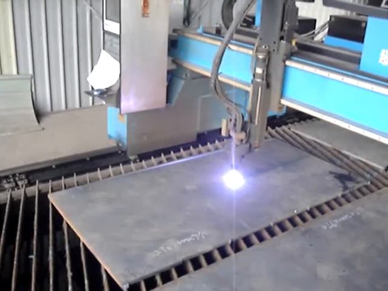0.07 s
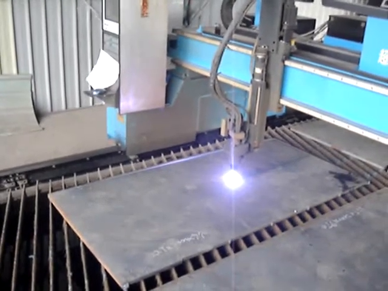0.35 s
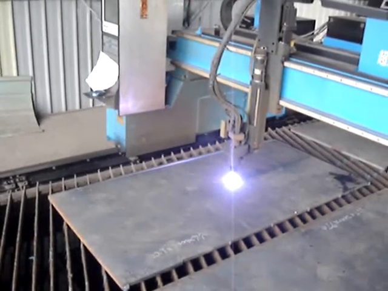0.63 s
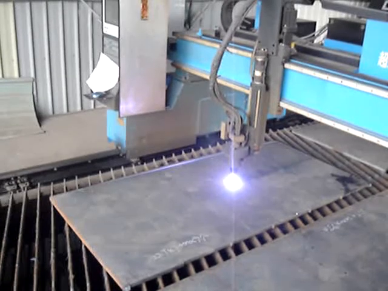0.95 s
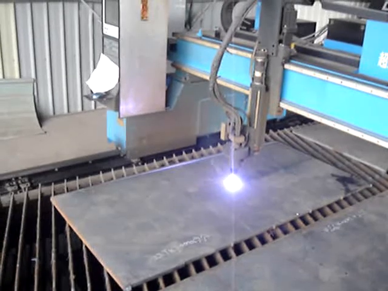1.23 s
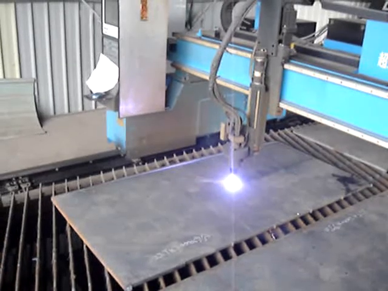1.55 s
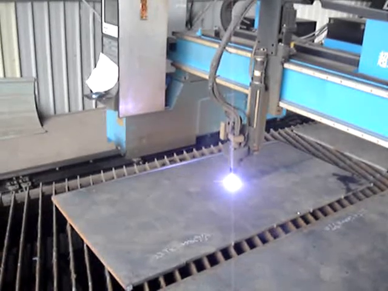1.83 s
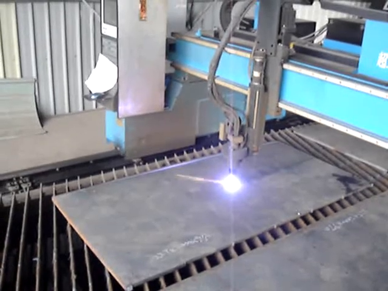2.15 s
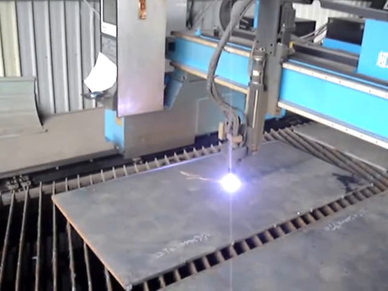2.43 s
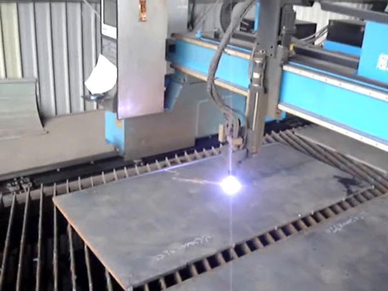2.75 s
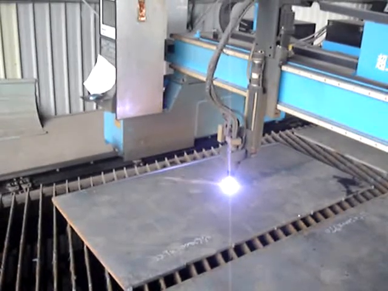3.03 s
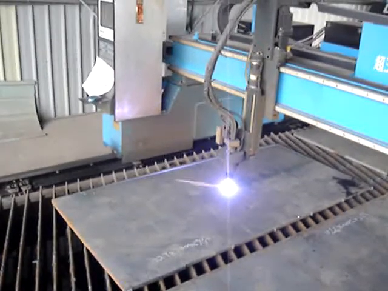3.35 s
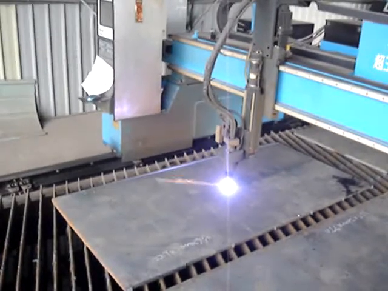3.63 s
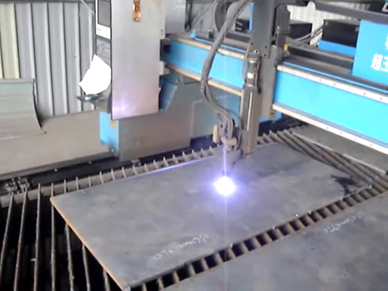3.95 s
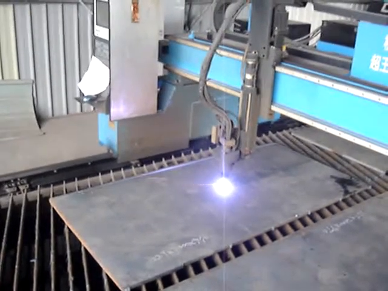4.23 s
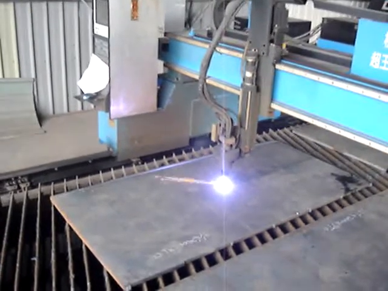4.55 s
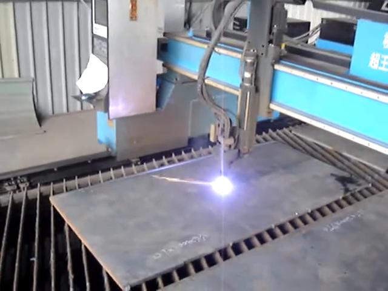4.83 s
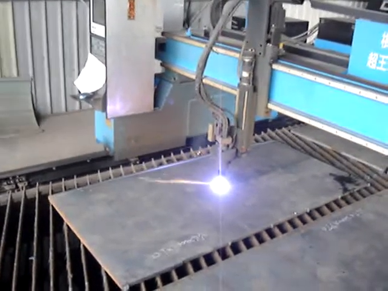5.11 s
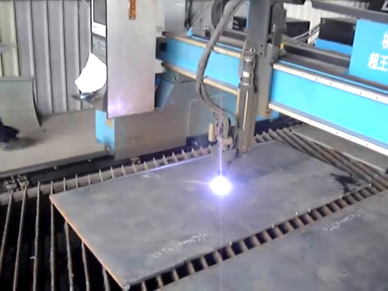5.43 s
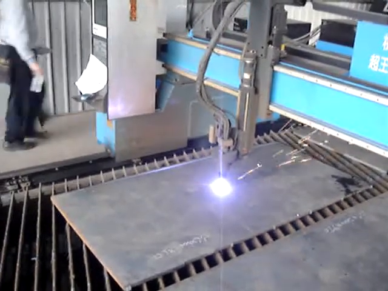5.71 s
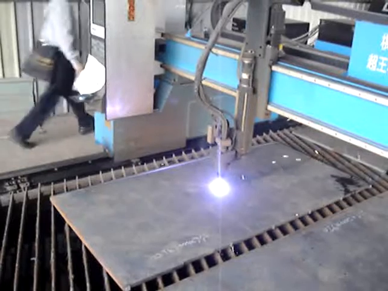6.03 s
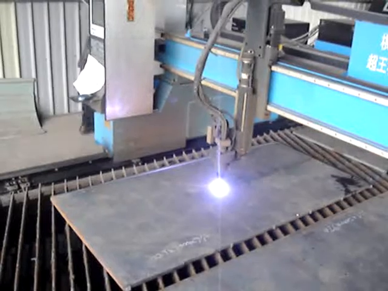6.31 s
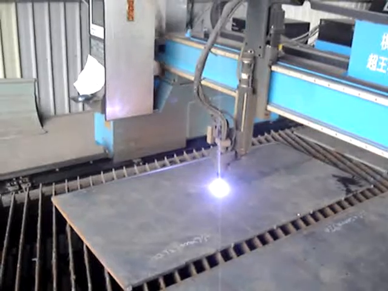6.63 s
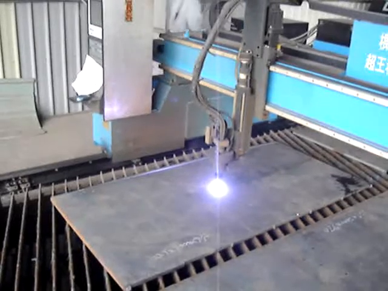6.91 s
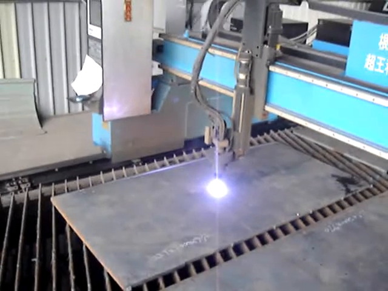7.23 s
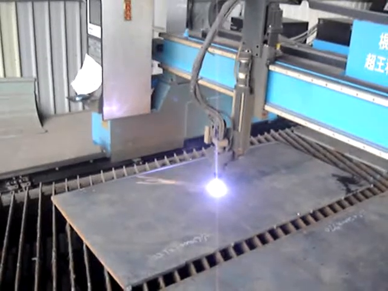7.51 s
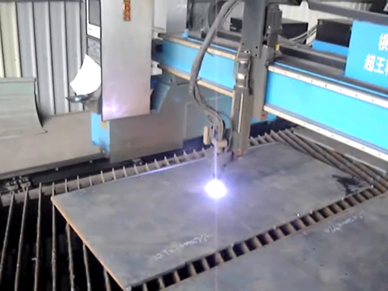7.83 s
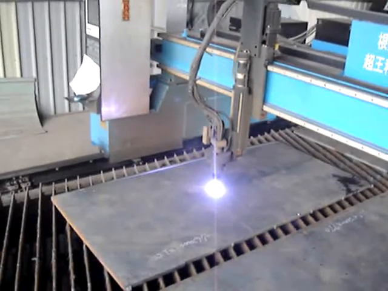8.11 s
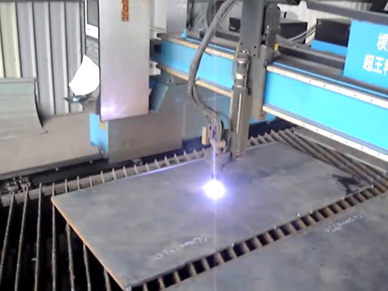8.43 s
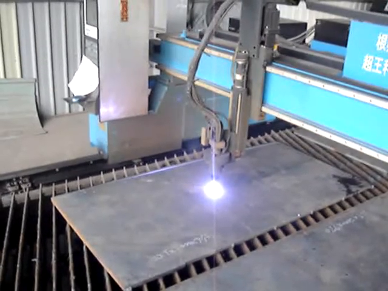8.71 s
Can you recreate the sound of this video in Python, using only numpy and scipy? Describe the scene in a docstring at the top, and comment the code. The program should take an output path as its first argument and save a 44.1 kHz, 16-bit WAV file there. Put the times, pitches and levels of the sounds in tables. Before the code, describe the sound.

Close, harsh hissing and a piercing whistle from a plasma cutter, over a soft flame roar with one brief whoosh early on.

```python
"""Plasma torch cutting steel plate.

A cutting machine in a workshop, heard close. The gas jet hisses through the resonances of nozzle
and cut and whistles with a high whine. The band around the whine drops out for milliseconds at a
time, heard as a flicker. The flame roars under the plate. Once the jet flares with a hollow whoosh,
as if crossing a slat of the table. Far off, an engine changes speed."""
import sys
import numpy as np
from scipy import signal
from scipy.fft import rfft, irfft
from scipy.io import wavfile
from scipy.ndimage import uniform_filter1d

SR = 44100
rng = np.random.default_rng(int(sys.argv[2]) if len(sys.argv) > 2 else 0)


def transcribe(signal):
    """Save signal, clipped to [-1, 1], as a 16-bit WAV file at the path in sys.argv[1]."""
    frames = np.atleast_2d(signal).T
    limited = np.clip(frames, -1, 1)
    pcm = np.round(limited * 32767).astype(np.int16)
    wavfile.write(sys.argv[1], SR, pcm)


N = 386316
TIME_S = np.arange(N) / SR
FREQS_HZ = np.fft.rfftfreq(N, 1 / SR)


def from_db(db):
    """Decibels to amplitude."""
    return 10 ** (np.asarray(db) / 20)


def unit_rms(x):
    """Scales to rms 1."""
    return x / np.sqrt(np.mean(x ** 2) + 1e-20)


def curve(rows):
    """Interpolates (seconds, value) rows at every sample."""
    return np.interp(TIME_S, *np.transpose(rows))


def arch(middle_s, length_s):
    """A smooth rise from 0 to 1 and back."""
    return np.cos(np.pi * np.clip((TIME_S - middle_s) / length_s, -.5, .5)) ** 2


def swells_db(rows):
    """Sum of arch-shaped swells or dips."""
    return sum(lift_db * arch(middle_s, length_s) for middle_s, length_s, lift_db in rows)


def resonance(hz, centre_hz, width_hz):
    """A resonance peak of height 1."""
    return 1 / (1 + (2 * (hz - centre_hz) / width_hz) ** 2)


def colour(spectrum, modes=()):
    """Gain over frequency: a smooth spectrum lifted by resonances."""
    points_hz, points_db = np.transpose(spectrum)
    smooth_db = np.interp(np.log(FREQS_HZ + 1), np.log(points_hz + 1), points_db)
    lift_db = sum(db * resonance(FREQS_HZ, hz, width_hz) for hz, width_hz, db in modes)
    return from_db(smooth_db + lift_db)


def band(hz, width_hz, order):
    """Gain of a band around hz; higher orders are steeper."""
    return 1 / np.sqrt(1 + abs(2 * (FREQS_HZ - hz) / width_hz) ** (2 * order))


def filtered(x, gain):
    """Applies a gain over frequency."""
    return irfft(rfft(x) * gain, N)


def noise(gain):
    """Noise of rms 1 with the given colour."""
    return unit_rms(filtered(rng.standard_normal(N), gain))


def sine(hz):
    """A sine of peak 1 following a frequency curve."""
    return np.sin(2 * np.pi * np.cumsum(hz) / SR)


def wander(rate_hz):
    """Random control of rms 1, low-passed at rate_hz."""
    lowpass = signal.butter(2, rate_hz, fs=SR)
    return unit_rms(signal.lfilter(*lowpass, rng.standard_normal(N)))


def patchy(x, depth_db, window, bins, frames):
    """Swells and sinks random patches of the spectrogram, keeping the overall level."""
    spectra = signal.stft(x, nperseg=window)[2]
    patches = uniform_filter1d(rng.standard_normal(spectra.shape), bins, axis=0)
    patches = unit_rms(uniform_filter1d(patches, frames, axis=1))
    mottled = signal.istft(spectra * from_db(depth_db * patches), nperseg=window)[1][:N]
    return x.std() * unit_rms(mottled)


def travel(start_s=4.3, end_s=5.46):
    """Progress of the torch: 0 early in the cut, 1 late."""
    return np.interp(TIME_S, [start_s, end_s], [0, 1])


# Engine speed. Each row: time in seconds, firing rate in Hz.
ENGINE_SPEED = [(0, 53), (.3, 54.5), (.7, 61), (1.1, 57.5), (1.7, 58), (2.4, 69.5), (2.7, 69.5), (3.1, 66),
                (3.8, 70), (4.1, 67), (4.55, 55), (5.8, 62), (6.35, 68.5), (6.8, 66.5), (7.5, 73),
                (7.9, 73.5), (8.25, 68), (8.76, 70.5)]
# Dips in the hum. Each row: middle and length in seconds, first- and second-order change in dB.
HUM_DIPS = [(4.25, .5, -10, -11), (6.53, .25, -7, -7), (7.97, 0.61, -2, -14)]


def engine(reference_hz=65.9, first_db_per_hz=1.1, second_db_per_hz=.43, boom_db=8.5, waver_db=.9):
    """A far engine's two lowest orders come through the walls, louder as it speeds up."""
    firing_hz = curve(ENGINE_SPEED)
    excess_hz = firing_hz - reference_hz
    first_db = -74 + first_db_per_hz * excess_hz
    second_db = -65.5 + second_db_per_hz * excess_hz
    second_db += boom_db * resonance(2 * firing_hz, centre_hz=137.2, width_hz=13)  # workshop mode
    for middle_s, length_s, first_dip_db, second_dip_db in HUM_DIPS:
        dip = arch(middle_s, length_s)
        first_db += first_dip_db * dip
        second_db += second_dip_db * dip
    first = unit_rms(sine(firing_hz)) * from_db(first_db)
    second = unit_rms(sine(2 * firing_hz)) * from_db(second_db)
    return (first + second) * from_db(waver_db * wander(7))


# Flame strength. Each row: time in seconds, roar level in dB.
ROAR_LEVEL = [(0, -38.5), (2.1, -39), (3.2, -36.5), (4.1, -37), (5.0, -37.8), (5.8, -38.5), (6.25, -36.5),
              (7.5, -36.5), (8.76, -37)]
# Roar and rumble spectra. Each row: frequency in Hz, relative level in dB.
ROAR_SPECTRUM = [(20, -33), (50, -31.5), (100, -21), (170, -12.5), (330, -7), (520, -0.5), (950, -1),
                 (1500, -1), (2000, -8), (3500, -8), (10000, -32.5)]
RUMBLE_SPECTRUM = [(60, -36.5), (140, -13.5), (200, -2), (250, 2), (300, 5), (350, -5), (560, -22),
                   (1200, -40)]
# Cutting-table resonances. Each row: frequency in Hz, width in Hz, lift in dB.
TABLE_MODES = [(305, 40, 2), (394, 30, 2), (480, 50, 2), (770, 80, 2.5), (950, 70, 2.5), (1120, 130, 2),
               (1310, 80, 1.5)]
# The table's moans. Each row: middle in seconds, length in seconds, lift in dB.
MOANS = [(4.72, .6, 5.5), (5.98, .5, 9), (6.42, .45, 4.5), (7.1, 0.49, 4)]


def flame(rumble_db=-50.4, rumble_db_per_db=1.9, moan_db=-51):
    """The flame roars under the plate; the hollow table rumbles with it and now and then moans."""
    roar_db = curve(ROAR_LEVEL)
    surge_db = roar_db - roar_db.mean()
    roar = noise(colour(ROAR_SPECTRUM, TABLE_MODES)) * from_db(roar_db)
    rumble = noise(colour(RUMBLE_SPECTRUM)) * from_db(rumble_db + rumble_db_per_db * surge_db)
    moan = noise(band(385, 130, order=3)) * from_db(moan_db + swells_db(MOANS))
    return roar + rumble + moan


# Whoosh spectrum. Each row: frequency in Hz, relative level in dB.
WHOOSH_SPECTRUM = [(60, -43), (170, -19), (280, -6.5), (420, -5), (600, -3.5), (950, -4), (1400, -4.5),
                   (2100, -8), (2700, -11), (8000, -40)]
# Table resonances rung by the flare. Each row: frequency in Hz, width in Hz, lift in dB.
FLARE_MODES = [(390, 26, 7), (430, 33, 6.5), (970, 77, 4.5), (2120, 250, 4), (2990, 150, 9.5)]


def flare(peak_s=1.215, level_db=-26, punch_db=1.5, hold_s=.32, split_hz=1400, ring_t60_s=2.6):
    """A whoosh in the hollow table swells, sags and dies; treble goes first, the lowest mode rings on."""
    rise_db_per_s, sag_db_per_s, release_db_per_s, dulling_db_per_s = 190, 18.5, 49, 16
    before_s = np.maximum(peak_s - TIME_S, 0)
    age_s = np.maximum(TIME_S - peak_s, 0)
    held_s = np.minimum(age_s, hold_s)
    attack = from_db(level_db - rise_db_per_s * before_s + punch_db * arch(peak_s, length_s=.099))
    decay = from_db(-sag_db_per_s * held_s - release_db_per_s * (age_s - held_s))
    rush = noise(colour(WHOOSH_SPECTRUM, FLARE_MODES))
    low = filtered(rush, band(0, 2 * split_hz, order=3))
    treble = (rush - low) * from_db(-2 - dulling_db_per_s * age_s)
    ring = sine(394 + 5 * wander(20)) * from_db(-11 - 60 * age_s / ring_t60_s)
    return attack * ((low + treble) * decay + ring)


def kerf_ring(level_db=-45):
    """One resonance of the cut comes and goes as the torch travels."""
    ring = noise(band(2695, 95, order=2))
    return ring * from_db(level_db) * arch(middle_s=3.6, length_s=2.3)


# Strength of the jet's lower tone. Each row: time in seconds, level in dB.
LOWER_TONE_LEVEL = [(0, -44), (1.25, -42), (1.8, -51), (3.9, -43.5), (4.7, -43.5), (5.5, -48.5), (6.8, -43),
                    (7.3, -47), (8.76, -46.5)]


def jet_tones(upper_hz=6927, lower_hz=1852, upper_early_db=-40, upper_late_db=-37):
    """Two faint jet tones: a fuzzy high one that grows late in the cut, a low one that wavers."""
    upper_db = upper_early_db + (upper_late_db - upper_early_db) * travel()
    upper = noise(band(upper_hz, 80, order=2))
    core = sine(lower_hz + 16 * wander(50))
    lower = unit_rms(core + .7 * noise(band(lower_hz, 44, order=2)))
    return upper * from_db(upper_db) + lower * from_db(curve(LOWER_TONE_LEVEL))


# Hiss spectrum. Each row: frequency in Hz, relative level in dB.
HISS_SPECTRUM = [(300, -37), (1200, -15.5), (2000, -10.5), (2500, -9), (3200, -5.5), (4500, -1.5),
                 (5500, -0.3), (6600, 1), (8200, 0.35), (9250, -1.5), (9600, 5), (10000, 1.5)]
# Nozzle and cut resonances. Each row: frequency in Hz, width in Hz, early and late lift in dB.
NOZZLE_MODES = [(2180, 70, 2, 2), (2695, 95, 4, 7), (3220, 120, 1.5, 1.5), (3430, 110, 3.5, 3),
                (3700, 110, 4, 4.5), (3925, 90, 3, 3.5), (4168, 80, 4, 6.5), (4285, 50, 2.5, 3),
                (4440, 160, -1, -2), (4970, 190, 4.5, 3), (5102, 50, 3, 4.5), (5802, 50, 3, 2.5),
                (6045, 40, 1.5, 3), (6560, 80, 1, 3.5), (6870, 200, 2, 4), (9650, 300, 3, 2.5)]


def hiss(early_db=-20, late_db=-19.5, flutter_db=.41):
    """The turbulent jet rings the nozzle and the cut, whose resonances change as the torch travels."""
    early_modes = [(hz, width_hz, db) for hz, width_hz, db, _ in NOZZLE_MODES]
    late_modes = [(hz, width_hz, db) for hz, width_hz, _, db in NOZZLE_MODES]
    early = noise(colour(HISS_SPECTRUM, early_modes)) * from_db(early_db)
    late = noise(colour(HISS_SPECTRUM, late_modes)) * from_db(late_db)
    rush = np.sqrt(1 - travel()) * early + np.sqrt(travel()) * late
    rush = patchy(rush, depth_db=.54, window=256, bins=5, frames=4)  # quick eddies
    rush = patchy(rush, depth_db=1.27, window=2048, bins=6, frames=36)  # slowly shifting reflections
    return rush * from_db(flutter_db * wander(12))


# The whistle's swells. Each row: middle in seconds, length in seconds, lift in dB.
WHINE_SWELLS = [(1.3, .6, 2), (1.73, .35, 1.2), (4.53, .55, 4), (4.86, .6, 2.5), (6.45, 0.76, 2),
                (7.78, .4, 2), (8.22, .35, 2)]


def whine_lift_db(unsteady_db=.45):
    """The whistle catches and swells, never quite steady."""
    return swells_db(WHINE_SWELLS) + unsteady_db * wander(6)


def whine(lift_db, rest_hz=8773, rest_db=-26.5, bend_hz=18, jitter_hz=36, wobble_db=1.0):
    """The jet whistles at the nozzle; turbulence jostles its pitch and adds a skirt of noise."""
    pitch_hz = rest_hz + bend_hz * arch(middle_s=4.2, length_s=4) + jitter_hz * wander(120)
    tone = unit_rms(sine(pitch_hz)) * from_db(wobble_db * wander(25))
    skirt = noise(band(8740, 640, order=3)) * from_db(-5.2)
    return (tone + skirt) * from_db(rest_db + lift_db)


def band_dropouts(x, lift_db, mean_margin=.58, margin_per_db=.13, softness=.047, depth_db=-16):
    """The band around the whine drops out for milliseconds, less often when the whine is strong."""
    highpass = FREQS_HZ / np.hypot(FREQS_HZ, 3)  # keeps long gaps rare
    chance = noise(highpass * band(0, 105, order=1) * band(0, 640, order=3))
    margin = chance + mean_margin + margin_per_db * (lift_db - lift_db.mean())
    dropout = .5 - .5 * np.tanh(margin / softness)
    whine_band = filtered(x, band(8810, 840, order=4))
    return x - (1 - from_db(depth_db)) * dropout * whine_band


# Reflections off plate and gantry. Each row: delay in seconds, gain.
ECHOES = [(.00165, -.05), (.002613, .08), (.004093, .06)]


def steel_echoes(x):
    """Nearby steel adds short, weak echoes."""
    echoes = sum(gain * np.exp(-2j * np.pi * FREQS_HZ * delay_s) for delay_s, gain in ECHOES)
    return filtered(x, 1 + echoes)


def scene():
    """The close torch over the far engine, the same in both channels."""
    lift_db = whine_lift_db()
    torch = hiss() + kerf_ring() + whine(lift_db) + jet_tones() + flame() + flare()
    mono = band_dropouts(steel_echoes(torch), lift_db) + engine()
    return np.array([mono, mono])


def record(dry, cutoff_hz=10060):
    """A steep low-pass removes the top treble."""
    taps = signal.firwin(1023, cutoff_hz, window=("kaiser", 9), fs=SR)
    return signal.oaconvolve(dry, taps[None], "same")


dry = scene()
out = record(dry)
transcribe(out)
```